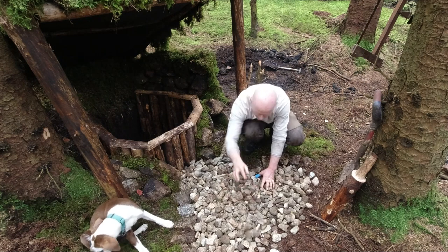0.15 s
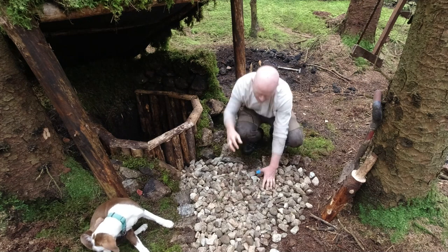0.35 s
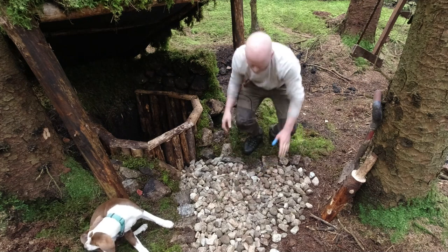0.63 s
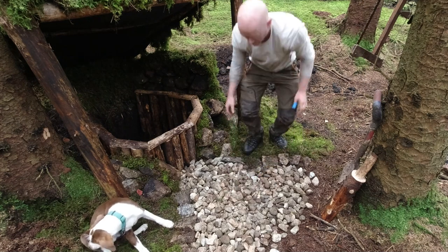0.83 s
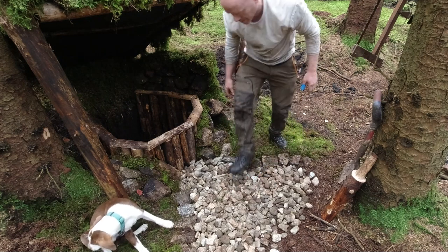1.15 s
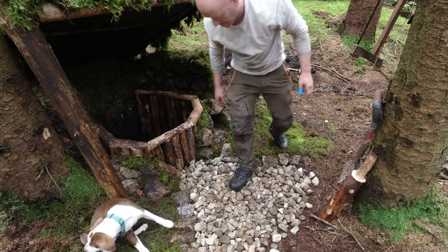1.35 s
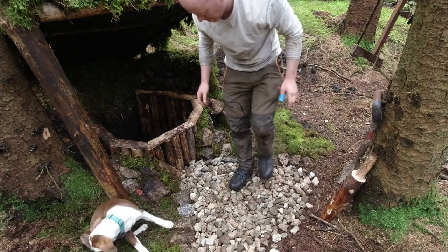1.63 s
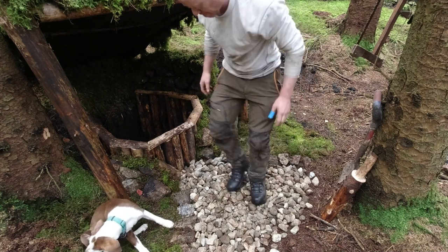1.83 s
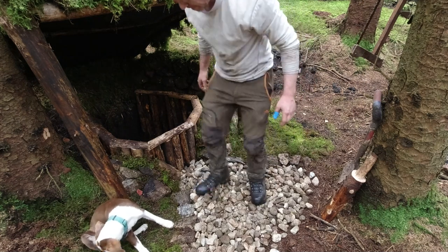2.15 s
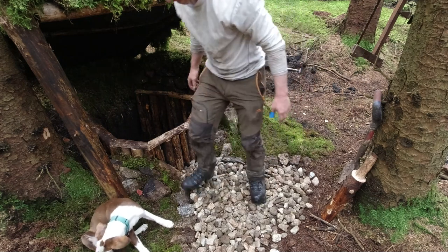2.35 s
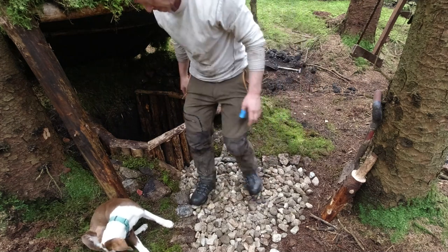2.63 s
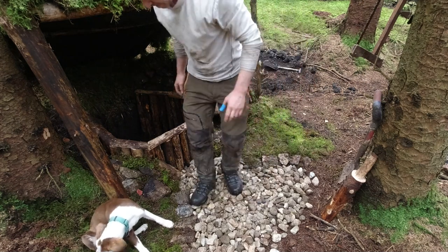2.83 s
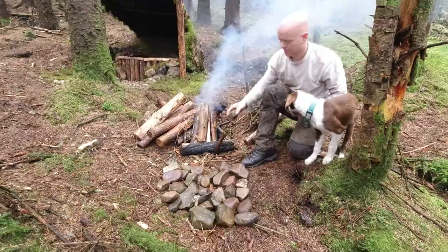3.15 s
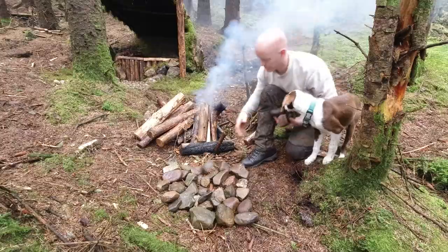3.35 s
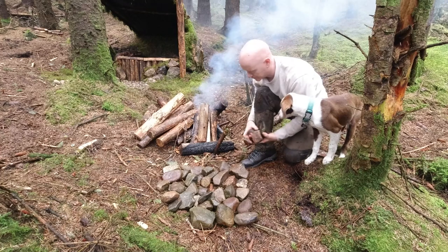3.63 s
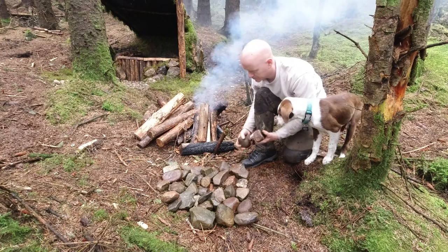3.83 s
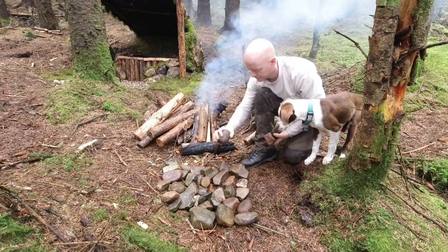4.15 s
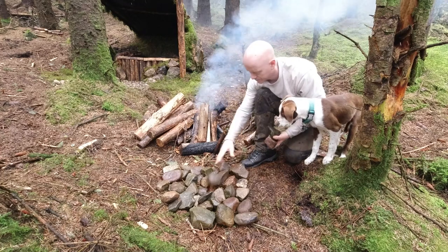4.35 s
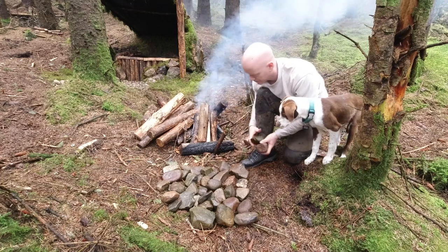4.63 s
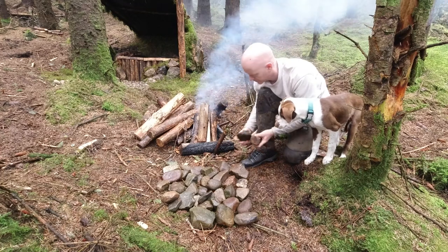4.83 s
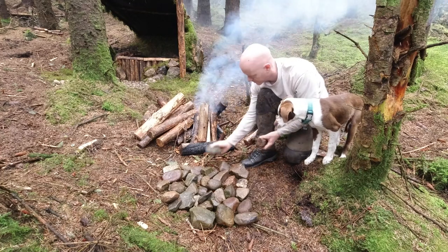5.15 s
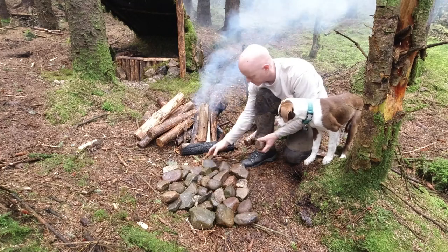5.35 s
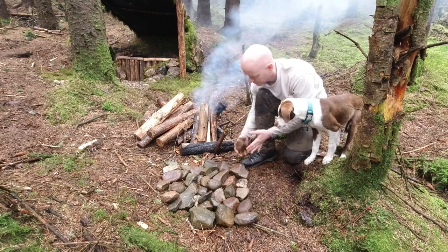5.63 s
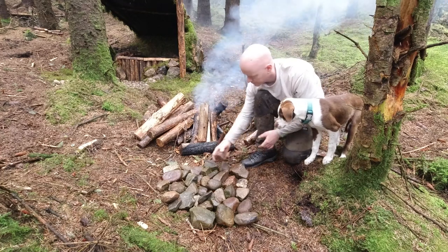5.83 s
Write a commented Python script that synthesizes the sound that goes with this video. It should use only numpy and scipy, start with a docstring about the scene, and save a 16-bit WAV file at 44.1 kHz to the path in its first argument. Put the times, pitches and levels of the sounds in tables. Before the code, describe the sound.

Gritty cobble crunches and knocks under footsteps, followed by separate ringing rock clacks with dull earth thuds, in a quiet woodland clearing.

```python
"""Stones knock and crunch close by in a forest clearing, under a low rush of wind and two thin bird chirps.
First a handful drops on a cobble bed and boots press it: wavelets for contacts, shaped noise for
knocks, cracking grains for grit. In a second scene three larger rocks are set down one by one, each with
a ringing clack and a thud of the soil, a falling sine. Trunks return faint decaying noise echoes.
A small pair of microphone ports hears it all, differing mostly in the treble."""
import sys
import numpy as np
from scipy import signal
from scipy.fft import rfft, irfft, next_fast_len
from scipy.io import wavfile
from scipy.ndimage import uniform_filter1d

SR = 44100
rng = np.random.default_rng(int(sys.argv[2]) if len(sys.argv) > 2 else 0)


def output_pcm(signal):
    """Save a mono or channel-first signal as 16-bit PCM at the path in sys.argv[1].

    Samples are clipped to [-1, 1] before scaling.
    """
    pcm = np.clip(np.atleast_2d(signal).T, -1, 1) * 32767
    wavfile.write(sys.argv[1], SR, np.round(pcm).astype(np.int16))


N = 264159
TIME = np.arange(N) / SR
SECOND_SCENE_S = 3.168

# wind in the trees, first scene: (frequency [Hz], relative density [dB per Hz])
AIR_FIRST_SPECTRUM = [(15, -32), (25, 1), (237, -6), (257, -4.5), (301, -6), (415, -6), (673, -7),
                      (1210, -13.5), (3260, -20), (15000, -58.5)]
# wind in the trees, second scene: (frequency [Hz], relative density [dB per Hz])
AIR_SECOND_SPECTRUM = [(15, -50.5), (25, -1.5), (49, -4.5), (88, -13.5), (219, -8), (286, -17),
                       (427, -17.5), (1280, -28.5), (2430, -33.5), (6900, -51), (9270, -52), (15000, -59)]
AIR_FIRST_DB = -67
# wind level through the second scene: (time [s], level [dB])
AIR_SECOND_LEVEL = [(3.17, -49.5), (3.28, -58.5), (3.45, -53.5), (3.55, -55), (3.8, -63), (4.35, -61.5),
                    (4.75, -67.5), (5.2, -65.5), (5.6, -65.5), (5.95, -64.5)]
# low gust as the second scene opens
GUST_PEAK_DB, GUST_ATTACK_S, GUST_HOLD_S, GUST_T60_S = -54.5, 0.0065, 0.17, 0.48
# thin bird chirps: (time [s], level [dB], pitch [Hz], 60 dB decay [s])
BIRD_CHIRPS = [(3.172, -62, 6870, 0.12), (3.17, -61, 5980, 0.14)]
# sound scattered back by trunks and canopy: (frequency [Hz], relative level [dB])
FOREST_COLOUR = [(100, 3), (500, 9.5), (1500, -0.5), (2200, -0.5), (3300, 0.5), (5000, 3), (10000, 2)]

# weight comes on the cobble bed, from the dropped handful and then from boots; levels are relative:
# (time [s], hollow knock [dB], gritty crunch [dB], 60 dB decay [s], second press re first [dB],
#  edge chips [dB], deep clunk [dB], soil thud [dB], hollow note [dB], hollow note pitch [Hz])
PRESSES = [(0.259, -55.5, -49, 0.49, -5, 5.5, -70, -45.5, -45, 201),
           (1.358, -33.5, -40.5, 0.2, 1, -5, -40.5, -30.5, -28.5, 268),
           (1.647, -46, -75.5, 0.038, -13, -35, -70, -64.5, -55.5, 297),
           (1.722, -46.5, -59, 0.15, -17, -35, -58.5, -65.5, -44, 280),
           (1.81, -29.5, -41, 0.12, -7, -20, -40.5, -54.5, -53, 300),
           (1.830, -38, -40, 0.23, -28, -3, -41.5, -32.5, -24, 347),
           (2.171, -27, -32.5, 0.12, -1, -4.5, -39.5, -40, -29, 282),
           (2.558, -26.5, -35.5, 0.17, -19, -22, -38, -31, -27, 216),
           (2.894, -34, -48, 0.23, -8.5, -35, -40.5, -36.5, -31, 274),
           (2.954, -49, -50.5, 0.11, -58, -26, -48, -55.5, -34.5, 542)]
ROLL_S = 0.023  # from the first press to the second, as the sole rolls down
# hollow knock of a sole on packed cobbles: (frequency [Hz], relative density [dB per Hz])
KNOCK_SPECTRUM = [(50, -20), (110, 11.5), (170, 5), (280, 1.5), (400, -10.5), (550, -8.5), (800, -8.5),
                  (1300, -12.5), (2500, -56)]
# grit crushed between stones: (frequency [Hz], relative density [dB per Hz])
GRIT_SPECTRUM = [(300, -27), (800, -21.5), (1500, -0.5), (2400, 0.5), (3400, -2.5), (4500, -5.5),
                 (6500, -13), (9500, -24), (11500, -29.5), (15000, -44.5)]
# the harder the crunch, the brighter: extra dB of treble per dB above the usual crunch
GRIT_TREBLE_HZ, GRIT_BRIGHTENS, USUAL_CRUNCH_DB = 5500, 0.64, -34
CLUNK_HZ, CLUNK_WIDTH_HZ = 614, 420  # big cobbles shifting deep in the bed
SOIL_HZ, SOIL_T60_S = 51, 0.29  # springy soil under the bed
NOTE_T60_S = 0.086  # short hollow note of a press

# cobble on cobble: (time [s], relative level [dB], contact pitch [Hz], chatter energy re first contact [dB])
COBBLE_KNOCKS = [(0.2606, -20.5, 2760, -21.5), (0.265, -13.5, 2490, -19.5), (0.2772, -22, 3130, 5),
                 (.2907, -11, 2440, -2), (0.2964, -24.5, 2230, 1), (0.3155, -12.5, 2660, -6),
                 (0.3324, -22, 2320, 8), (0.4007, -28.5, 1890, -25), (.4257, -24.5, 3460, 3),
                 (0.5097, -31.5, 2760, 7), (0.525, -23.5, 3100, -3.5), (0.5662, -34, 1870, 0),
                 (0.5939, -30.5, 2520, -2), (0.6105, -24.5, 3460, -2.5), (0.621, -33, 2720, 1),
                 (0.6961, -38, 2250, 0), (1.05, -39, 2000, -1), (1.362, -16, 2430, -6),
                 (1.382, -16, 2390, 1), (1.406, -15, 2520, -2.5), (1.7362, -39, 2140, -3),
                 (1.816, -28, 1990, 5), (1.8303, -26.5, 1840, 15.5), (1.8598, -21.5, 2120, 2),
                 (2.1849, -14, 3380, 10), (2.2054, -12, 2750, 0), (2.251, -32.5, 2750, 2.5),
                 (2.321, -11, 2950, -10.5), (2.3736, -19.5, 3120, 2.5), (2.3806, -18, 3200, -0.5),
                 (2.4327, -13, 2700, -5), (2.45, -20.5, 3270, 9.5), (2.4823, -30.5, 2460, 1.5),
                 (2.511, -28, 2400, -12), (2.5655, -5, 2830, -60), (2.568, -25.5, 2220, 15),
                 (2.588, -16.5, 2680, 0), (2.607, -29.5, 2194, 5.5), (2.7264, -43.5, 2260, -9),
                 (2.897, -25, 2200, 4.5), (2.9348, -29.5, 2210, 13.5), (2.9586, -31.5, 1747, 7),
                 (3.0187, -30.5, 2330, -11), (3.085, -36, 2260, -9), (3.1251, -28, 2530, -12.5),
                 (3.1331, -33, 2130, -4), (3.1401, -39, 2660, 4.5)]
# resonances of the gaps between cobbles: (frequency [Hz], width [Hz], relative level [dB])
COBBLE_GAPS = [(2110, 27, -5), (2390, 250, -9), (3350, 340, 1.5), (4100, 160, -18), (9450, 200, 1)]
# edges chip most close in time to a press
CHIP_FADE_DB_PER_S, CHIP_LEAST_DB = 129.5, -40
# loose cobbles tick after each press, on the whole fainter and further apart
SETTLE_TICKS, SETTLE_FROM_S, SETTLE_TO_S = 14, 0.03, 0.33
SETTLE_DB, SETTLE_FADE_DB_PER_S, SETTLE_HZ, SETTLE_CHATTER_DB = -37.5, 46, 2450, 0.5
SETTLE_FOLLOWS = 0.22  # share of the crunch's dB swing that the ticks follow
COBBLE_PILE_DB, PILE_T60_S = -14, 0.26  # echoes inside the pile
CONTACT_LEAD_S = 64 / SR  # a contact wavelet is centred on its moment

# rock on rock: (time [s], relative level [dB], contact pitch [Hz], chatter energy re first contact [dB])
ROCK_KNOCKS = [(3.48, -7.5, 2160, -11), (3.492, -18.5, 1920, -1.5), (3.4974, -15, 1850, 0.5),
               (3.52, -32, 1820, 9), (3.5315, -24.5, 1650, -3), (3.5708, -18, 2160, -2),
               (3.574, -17, 2160, -8), (3.5877, -29.5, 1710, 1), (3.8456, -23.5, 1815, -8),
               (3.861, -35, 1570, -2.5), (4.4808, -8.5, 2000, -13.5), (4.4907, -10.5, 1620, -2),
               (4.496, -15.5, 1530, -6), (4.501, -20.5, 1260, 2.5), (4.5528, -43, 940, 1),
               (4.5649, -42.5, 1430, -8), (5.3243, -14.5, 1990, -8)]
# a rock comes to rest: (time [s], soil thud [dB], settled thud pitch [Hz], thud 60 dB decay [s],
#  scuff [dB], scuff 60 dB decay [s])
LANDINGS = [(3.480, -28, 77.9, 0.19, -51, 0.4), (4.478, -28, 81.6, 0.1135, -51.5, 0.16),
            (5.324, -18.5, 64.1, 0.083, -64, 0.16)]
HANDLING_LEAD_S = 0.1  # knocks count for a rock from this long before it lands
SINK_S = 0.01197  # from the clack until the soil takes the weight
REBOUND_S, REBOUND_DB, REBOUND_PITCH = 0.04, -7, 0.75  # the rock rocks back once, softer and lower
# modes of the first rock: (frequency [Hz], width [Hz], relative level [dB])
FIRST_ROCK = [(790, 100, -20.5), (2090, 160, 0), (2524, 46, 3), (3350, 130, -12), (3750, 110, -21.5)]
# modes of the second rock: (frequency [Hz], width [Hz], relative level [dB])
SECOND_ROCK = [(805, 79, -30.5), (1375, 40, -3.5), (1510, 23, -10), (1732, 54, -0.5), (2120, 31, -22),
               (2483, 71.2, 0.5)]
# modes of the third rock: (frequency [Hz], width [Hz], relative level [dB])
THIRD_ROCK = [(934, 36, -14), (1934, 180, -1), (2636, 99, 2), (3415, 110, -29)]

# difference between the two microphone ports: (frequency [Hz], level [dB])
PORT_DIFFERENCE = [(100, -28.5), (300, -23), (700, -20), (1400, -15.5), (2500, -12.5), (4200, -4.5),
                   (9000, -10), (14000, -7)]
# microphone colour: (frequency [Hz], level [dB])
MICROPHONE_COLOUR = [(9500, -1.5), (11500, -3.5), (15000, -9)]
CUTOFF_HZ = 15700


def from_db(db):
    """Amplitude factor of a level in dB."""
    return 10 ** (np.asarray(db) / 20)


def rms_one(x):
    """Scale a sound to an RMS of one."""
    return x / np.sqrt(np.mean(x ** 2) + 1e-20)


def add(track, s, sound):
    """Mix a sound into a track from time s on."""
    start = int(round(s * SR))
    track[..., start:start + sound.shape[-1]] += sound[..., :N - start]


def colour(x, points, turn=1):
    """Shape x by a spectrum of (Hz, dB) points; turn=1j or -1j shifts it by a quarter cycle."""
    size = next_fast_len(x.shape[-1] + 4096)
    hz = np.maximum(np.fft.rfftfreq(size, 1 / SR), 1)
    at_hz, at_db = np.transpose(points)
    gain = from_db(np.interp(np.log(hz), np.log(at_hz), at_db))
    return irfft(rfft(x, size) * turn * gain, size)[..., :x.shape[-1]]


def band_pass(x, low_hz, high_hz, order=2):
    """Keep only the band between two frequencies."""
    return signal.sosfilt(signal.butter(order, [low_hz, high_hz], "band", fs=SR, output="sos"), x)


def dying(t, t60):
    """Amplitude that falls by 60 dB in t60 seconds."""
    return np.exp(-np.log(1000) * t / t60)


def fall(t, attack_s, t60):
    """A quick rise, then a steady dying away."""
    return (1 - np.exp(-t / attack_s)) * dying(t, t60)


def grains(count, per_s, spread_db):
    """Random clicks of uneven size and sign, as met along and across the microphone axis."""
    shape = (2, count)
    sizes = from_db(spread_db * np.minimum(rng.exponential(1, shape), 3.5))
    signs = rng.choice([-1, 1], shape)
    present = rng.random(shape) < per_s / SR
    return sizes * signs * present


def resonate(x, modes):
    """The direct sound plus what rings on: each mode is a two-pole resonance."""
    out = x.copy()
    for hz, width_hz, db in modes:
        r = np.exp(-np.pi * width_hz / SR)
        poles = [1, -2 * r * np.cos(2 * np.pi * hz / SR), r * r]
        ringing = signal.lfilter([1, 0, -1], poles, x + 1e-18)
        out += from_db(db) * (1 - r * r) / 2 * ringing
    return out


def air():
    """Low rush of wind in the trees: shaped noise, stronger as the second scene opens."""
    first_noise = colour(rng.standard_normal((2, N)), AIR_FIRST_SPECTRUM)
    first_air = from_db(AIR_FIRST_DB) * rms_one(first_noise)
    second_noise = colour(rng.standard_normal((2, N)), AIR_SECOND_SPECTRUM)
    level = from_db(np.interp(TIME, *np.transpose(AIR_SECOND_LEVEL)))
    second_air = level * rms_one(second_noise)
    mid, across = np.where(TIME >= SECOND_SCENE_S, second_air, first_air)
    return mid + from_db(8.5) * colour(across, PORT_DIFFERENCE) * [[1], [-1]]


def gust(low_hz=165, high_hz=320):
    """A soft low rush of band-limited noise that swells, holds and passes."""
    t = TIME - SECOND_SCENE_S
    swell = np.clip(t / GUST_ATTACK_S, 0, 1) * dying(np.maximum(t - GUST_HOLD_S, 0), GUST_T60_S)
    rush = rms_one(band_pass(rng.standard_normal(N), low_hz, high_hz))
    return from_db(GUST_PEAK_DB) * swell * rush


def forest(x, wet_db=-21.5, t60=0.62, build_s=0.0072, width_db=6):
    """Faint diffuse echoes from the trunks, arriving from all round: convolution with decaying noise."""
    t = TIME[:SR]
    echoes = rng.standard_normal((2, len(t))) * fall(t, build_s, t60)
    echoes /= np.linalg.norm(echoes, axis=1, keepdims=True)
    scattered = signal.fftconvolve(colour(x, FOREST_COLOUR)[None], echoes, axes=1)[:, :N]
    mid, across = from_db(wet_db) * scattered
    wide_ports = [(hz, min(db + width_db, 0)) for hz, db in PORT_DIFFERENCE]
    return mid + colour(across, wide_ports) * [[1], [-1]]


def chirps(half_width_hz=120):
    """High bird notes, smeared by the trees into narrow dying bands of noise."""
    out, t = np.zeros(N), TIME[:SR // 4]
    for s, db, hz, t60 in BIRD_CHIRPS:
        band = band_pass(rng.standard_normal(len(t)), hz - half_width_hz, hz + half_width_hz)
        add(out, s, from_db(db) * rms_one(band) * dying(t, t60))
    return out


def thud(db, hz, t60, rise_s, sag, sag_s=0.017):
    """Soil or sole bounces a few cycles, stiffer and so higher at first while it is compressed."""
    t = TIME[:SR // 2]
    phase = 2 * np.pi * np.cumsum(hz * (1 + sag * np.exp(-t / sag_s))) / SR
    return from_db(db) * np.sin(phase) * fall(t, rise_s, t60)


def press_thuds():
    """Each press bounces the soil and sounds a short hollow note."""
    out = np.zeros(N)
    for s, *_, soil_db, note_db, note_hz in PRESSES:
        add(out, s, thud(soil_db, SOIL_HZ, SOIL_T60_S, rise_s=0.0017, sag=0.18))
        add(out, s + 0.002, thud(note_db, note_hz, NOTE_T60_S, rise_s=0.00039, sag=0.092))
    return out


def rock_thuds():
    """A rock sinks into the springy soil and rocks back once."""
    out = np.zeros(N)
    for s, db, hz, t60, *_ in LANDINGS:
        sink = thud(db, hz, t60, rise_s=0.0049, sag=0.15)
        rebound = thud(db + REBOUND_DB, hz * REBOUND_PITCH, t60, rise_s=0.0097, sag=0.086)
        add(out, s + SINK_S, sink)
        add(out, s + SINK_S + REBOUND_S, rebound)
    return out


def scuffs(low_hz=3900, high_hz=5300, per_s=6000):
    """Fine sand ground between two rocks gives a short bright rasp of dense grains."""
    out, t = np.zeros((2, N)), TIME[:SR // 3]
    for s, *_, db, t60 in LANDINGS:
        rasp = band_pass(grains(len(t), per_s, spread_db=5.3), low_hz, high_hz, order=1)
        add(out, s, from_db(db) * rms_one(rasp) * dying(t, t60))
    return out


def presses(rise_s=0.001, grit_rise_s=0.0045, grit_per_s=1000,
            knock_level_db=-2, grit_level_db=1.0, knock_across_db=-5):
    """Weight comes on in two goes: a hollow knock of the bed, a deep clunk, grit cracking between stones."""
    (knock, clunk, crunch, treble), t = np.zeros((4, N)), TIME[:SR // 2]
    for s, knock_db, crunch_db, t60, second_db, _, clunk_db, *_ in PRESSES:
        brightness = from_db(GRIT_BRIGHTENS * (crunch_db - USUAL_CRUNCH_DB))
        for at, db in ((s, 0), (s + ROLL_S, second_db)):
            slow_fall = fall(t, grit_rise_s, t60)
            load = from_db(crunch_db + grit_level_db + db) * slow_fall
            add(knock, at, from_db(knock_db + knock_level_db + db) * fall(t, rise_s, t60))
            add(clunk, at, from_db(clunk_db + db) * slow_fall)
            add(crunch, at, load)
            add(treble, at, load * brightness)

    def steady(x):
        """Even out the swings of a noise, so that the load alone sets its strength."""
        return x / np.sqrt(uniform_filter1d(x ** 2, size=900) + 1e-12)

    body = steady(colour(rng.standard_normal((2, N)), KNOCK_SPECTRUM))
    low_hz, high_hz = CLUNK_HZ - CLUNK_WIDTH_HZ / 2, CLUNK_HZ + CLUNK_WIDTH_HZ / 2
    deep = steady(band_pass(rng.standard_normal((2, N)), low_hz, high_hz))
    grit = steady(colour(grains(N, grit_per_s, spread_db=3.5), GRIT_SPECTRUM))
    dull = signal.sosfiltfilt(signal.butter(2, GRIT_TREBLE_HZ, fs=SR, output="sos"), grit)
    bed = (knock * body + clunk * deep) * from_db([[0], [knock_across_db]])
    return bed + resonate(crunch * dull + treble * (grit - dull), COBBLE_GAPS)


def contact(hz, cycles):
    """A stone hardly rings: its sudden stop radiates one short wavelet, lower for a longer contact."""
    u = hz * np.arange(-64, 65) / SR
    wavelet = np.sin(2 * np.pi * 0.62 * u) * np.exp(-(u / cycles) ** 2)
    return np.gradient(wavelet) * SR / (2 * np.pi * hz)


def clack(db, hz, chatter_db, chip_db, pile_db, cycles, mass_db, chatter_t60,
          chatter_per_s=4000, pile_per_s=1200, chip_hz=7400, mass_hz=580, ground_db=-11, ground_s=0.00115):
    """One contact with ground reflection, micro-bounces and echoes in the pile; mass adds a dull thock."""
    t = TIME[:SR // 4]
    chip = from_db(chip_db) * contact(chip_hz, cycles=0.52)
    thock = from_db(mass_db) * contact(mass_hz, cycles=0.3)
    pulse = contact(hz, cycles) + chip + thock
    chatter = grains(len(t), chatter_per_s, spread_db=2.5) * dying(t, chatter_t60) * (t > 0.0004)
    pile = grains(len(t), pile_per_s, spread_db=3.1) * dying(t, PILE_T60_S) * (t > 0.002)
    sound = np.zeros((2, len(t) + len(pulse) - 1))
    # contact and ground reflection come from straight ahead, the rest from all round
    sound[0, :len(pulse)] = pulse
    add(sound[0], ground_s * (1 + rng.uniform(-0.16, 0.39)), from_db(ground_db) * pulse)
    for train, share_db in ((chatter, chatter_db), (pile, pile_db)):
        after = signal.fftconvolve(train, pulse[None], axes=1)
        after /= np.linalg.norm(after, axis=1, keepdims=True) + 1e-12
        sound += from_db(share_db) * np.linalg.norm(pulse) * after
    return from_db(db) * sound


def settling():
    """Random small knocks in the wake of each press, as rows like COBBLE_KNOCKS."""
    rows = []
    for s, _, crunch_db, *_ in PRESSES:
        press_db = SETTLE_DB + SETTLE_FOLLOWS * (crunch_db - USUAL_CRUNCH_DB)
        for k, (when, size, pitch) in enumerate(rng.random((SETTLE_TICKS, 3))):
            wait = SETTLE_FROM_S * (SETTLE_TO_S / SETTLE_FROM_S) ** ((k + when) / SETTLE_TICKS)
            db = press_db - SETTLE_FADE_DB_PER_S * wait + 10 * (size - 0.5)
            hz = SETTLE_HZ * 2 ** ((pitch - 0.5) / 2)
            rows.append((s + wait, db, hz, SETTLE_CHATTER_DB))
    return rows


def cobbles(level_db=-2.5, chip_level_db=-3):
    """Cobbles knock together, with most edge chipping close to a press; the gaps between them ring."""
    out = np.zeros((2, N))
    for s, db, hz, chatter_db in list(COBBLE_KNOCKS) + settling():
        chips = [press[5] - CHIP_FADE_DB_PER_S * abs(s - press[0]) for press in PRESSES]
        chip_db = max([CHIP_LEAST_DB] + chips) + chip_level_db
        sound = clack(db + level_db, hz, chatter_db, chip_db, pile_db=COBBLE_PILE_DB,
                      cycles=0.41, mass_db=-42.5, chatter_t60=0.059)
        add(out, s - CONTACT_LEAD_S, sound)
    return resonate(out, COBBLE_GAPS)


def rocks(level_db=1.0, ring_db=1):
    """Larger rocks clack with more body; knocks ring the rock being set down. Gives clacks, ring."""
    out = np.zeros((3, 2, N))  # one pair of tracks for each rock
    taken_up = [s - HANDLING_LEAD_S for s, *_ in LANDINGS]
    for s, db, hz, chatter_db in ROCK_KNOCKS:
        sound = clack(db + level_db, hz, chatter_db, chip_db=-42, pile_db=-16.5,
                      cycles=0.36, mass_db=-23, chatter_t60=0.029)
        add(out[np.searchsorted(taken_up, s) - 1], s - CONTACT_LEAD_S, sound)
    rock_modes = (FIRST_ROCK, SECOND_ROCK, THIRD_ROCK)
    ring = sum(resonate(rock, modes) - rock for rock, modes in zip(out, rock_modes))
    return out.sum(axis=0), from_db(ring_db) * ring


def ports(ahead, across, delay_db=-2, across_db=0):
    """The ports differ mostly in the treble: by a slight delay, and by sound arriving from the sides."""
    difference = from_db(delay_db) * ahead + from_db(across_db) * across
    side = colour(difference, PORT_DIFFERENCE, turn=-1j)
    return ahead + side * [[1], [-1]]


def scene(sheltered_db=-4, ring_echo_db=-9):
    """Stones and boots just ahead of the microphone; cobble bed and rock ring wake less forest echo."""
    rock_clacks, ring = rocks()
    stones, across = cobbles() + rock_clacks + presses() + scuffs()
    near = stones + press_thuds() + rock_thuds() + chirps()
    openness = from_db(sheltered_db * (TIME < SECOND_SCENE_S))  # the cobble bed is sheltered
    direct = ports(near + ring[0], across + ring[1])
    echoes = forest(near * openness + from_db(ring_echo_db) * ring[0])
    return direct + echoes + air() + gust()


def record(dry):
    """The microphone dulls the top of the treble, which is then cut steeply."""
    treble_cut = signal.ellip(10, 0.1, 80, CUTOFF_HZ, fs=SR, output="sos")
    return signal.sosfilt(treble_cut, colour(dry, MICROPHONE_COLOUR))


dry = scene()
out = record(dry)
output_pcm(out)
```